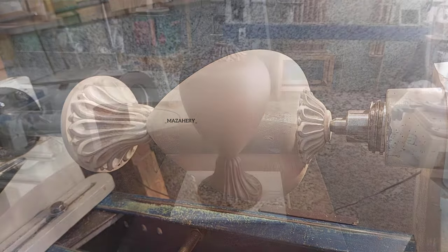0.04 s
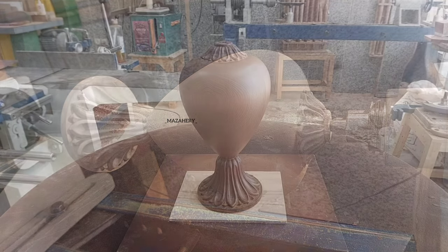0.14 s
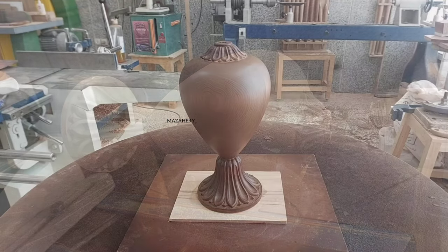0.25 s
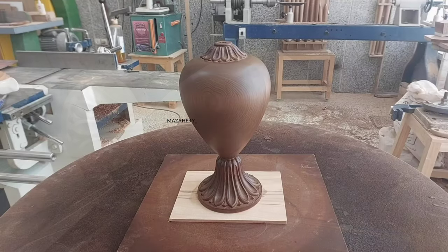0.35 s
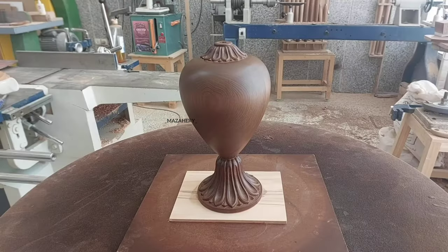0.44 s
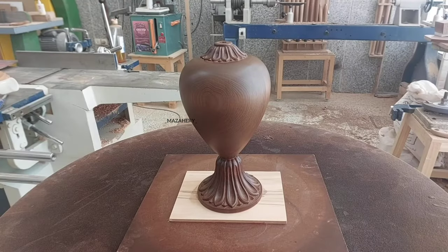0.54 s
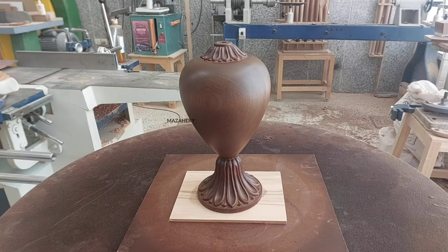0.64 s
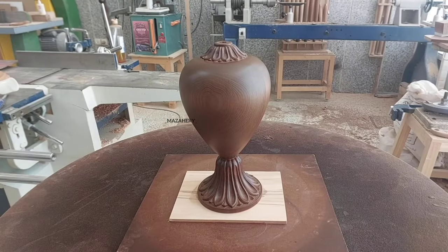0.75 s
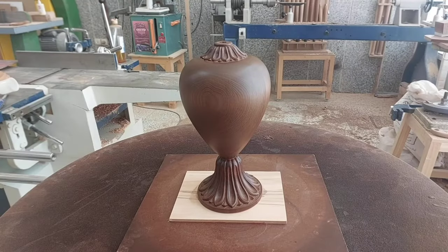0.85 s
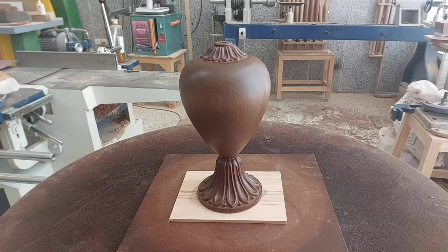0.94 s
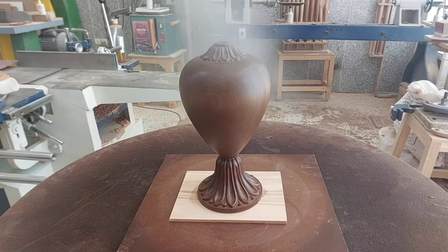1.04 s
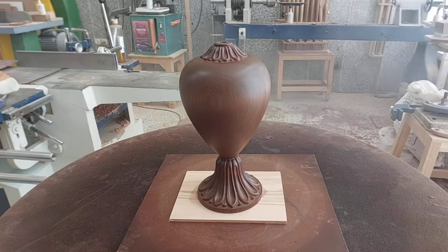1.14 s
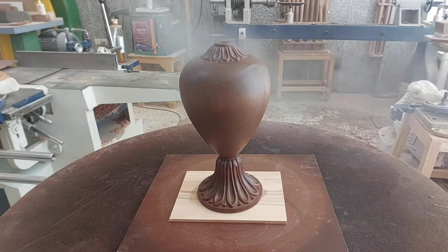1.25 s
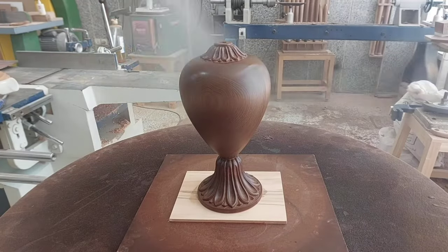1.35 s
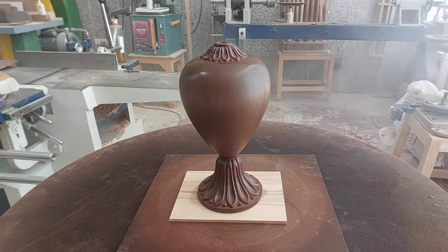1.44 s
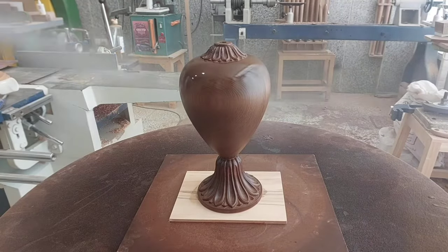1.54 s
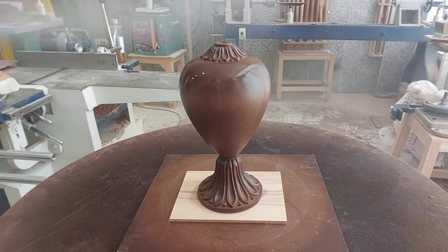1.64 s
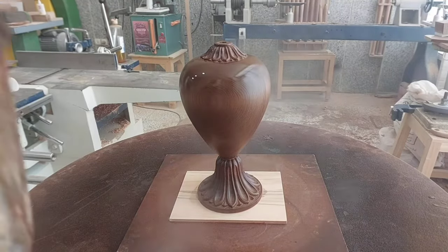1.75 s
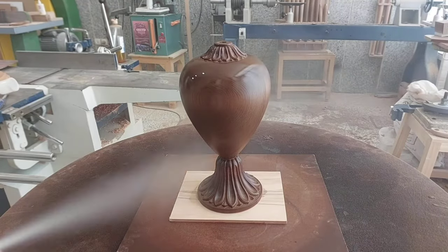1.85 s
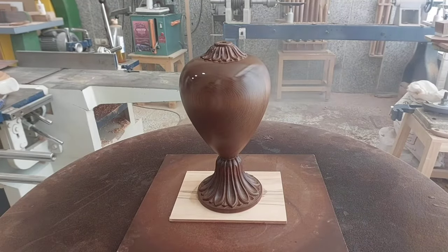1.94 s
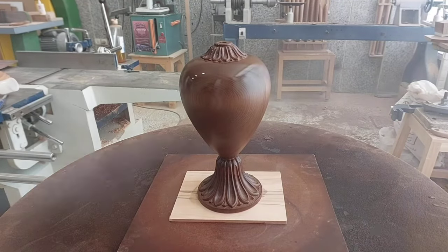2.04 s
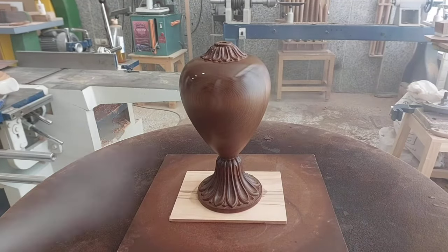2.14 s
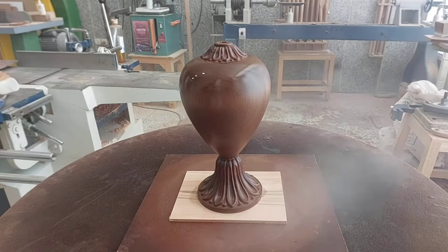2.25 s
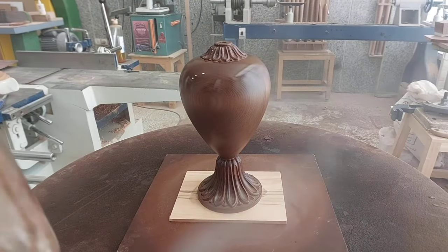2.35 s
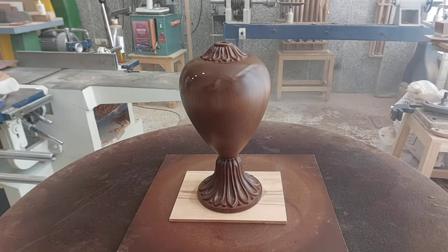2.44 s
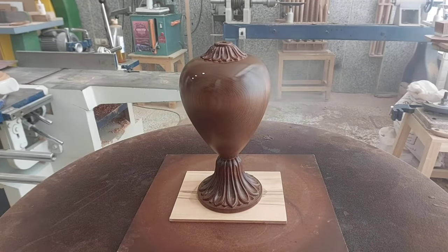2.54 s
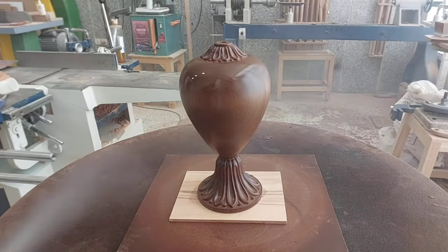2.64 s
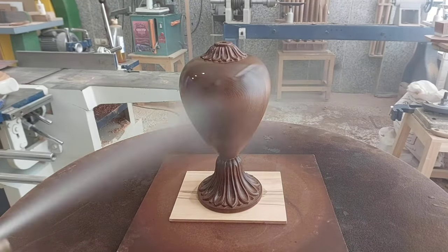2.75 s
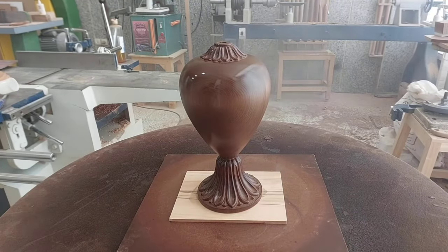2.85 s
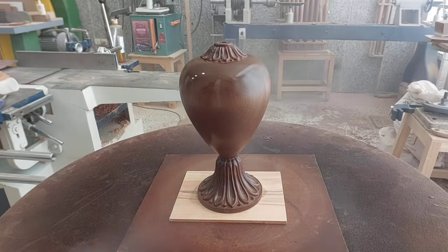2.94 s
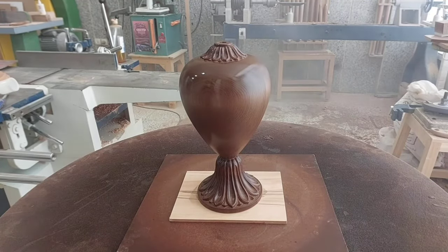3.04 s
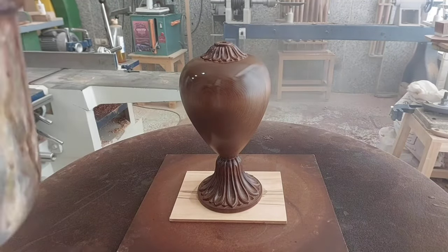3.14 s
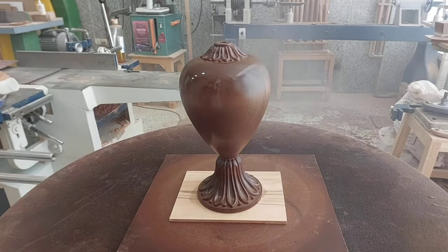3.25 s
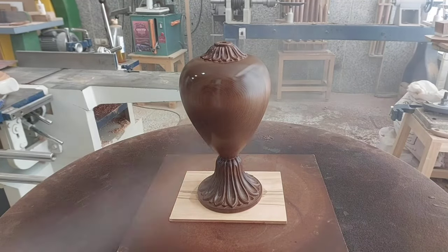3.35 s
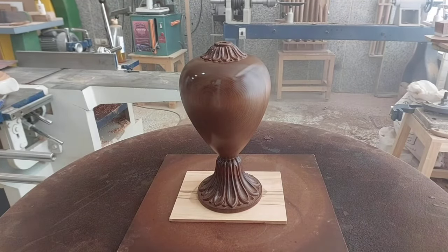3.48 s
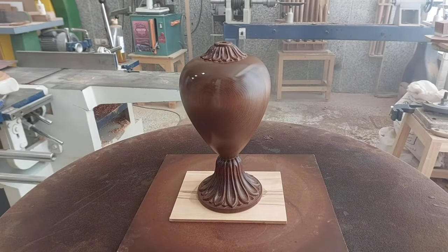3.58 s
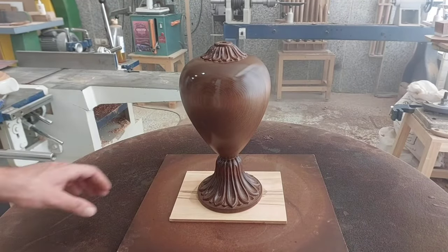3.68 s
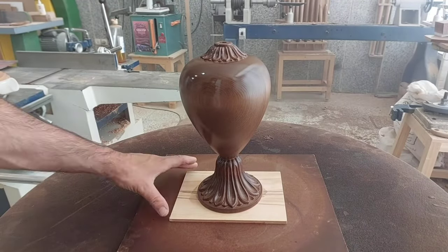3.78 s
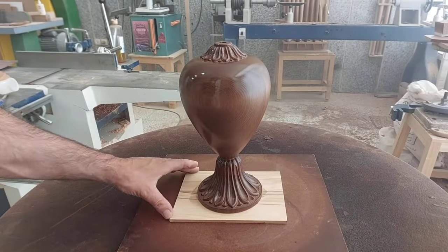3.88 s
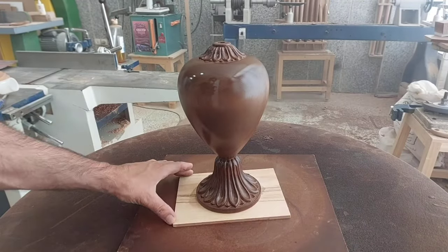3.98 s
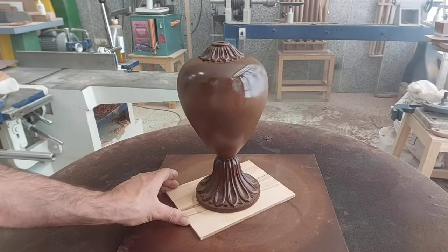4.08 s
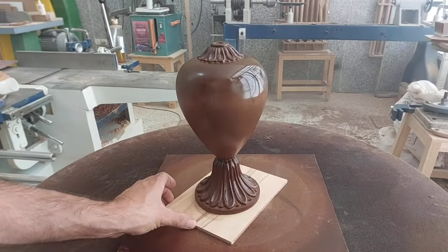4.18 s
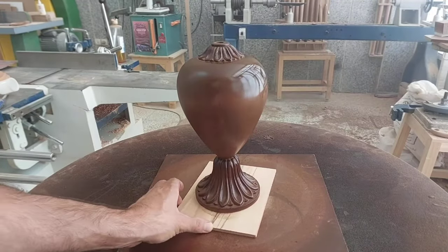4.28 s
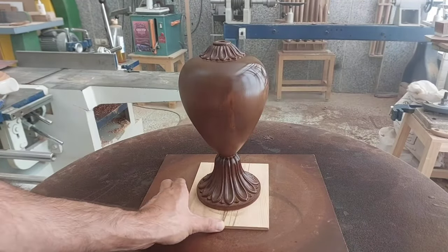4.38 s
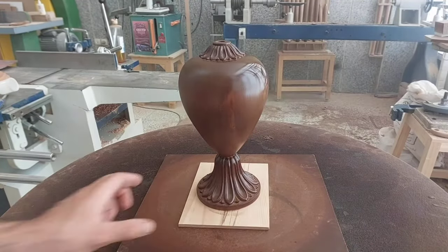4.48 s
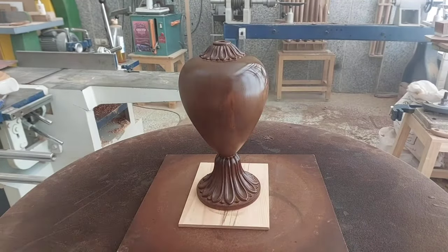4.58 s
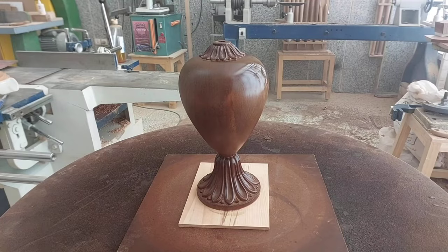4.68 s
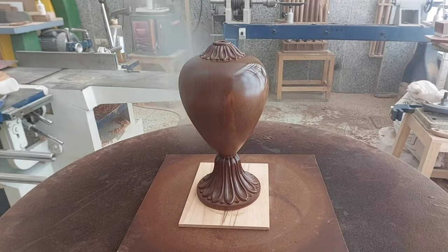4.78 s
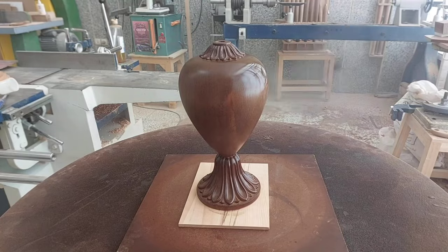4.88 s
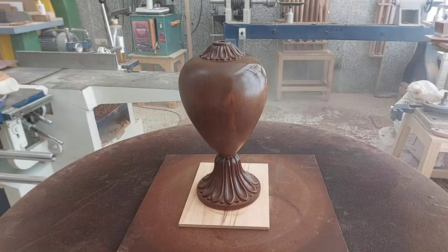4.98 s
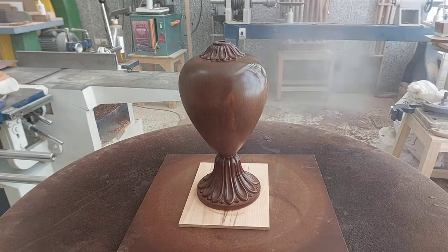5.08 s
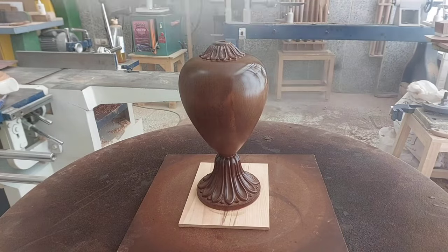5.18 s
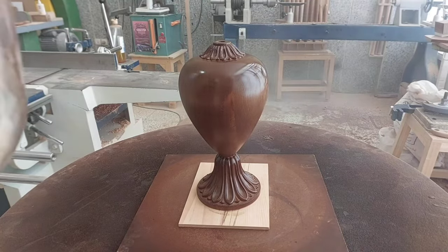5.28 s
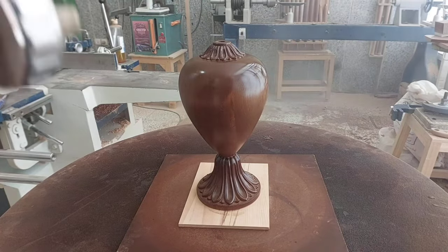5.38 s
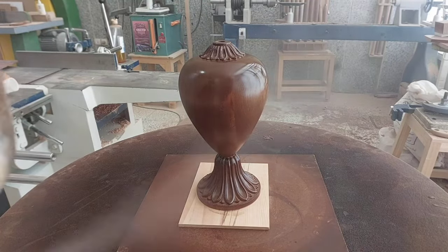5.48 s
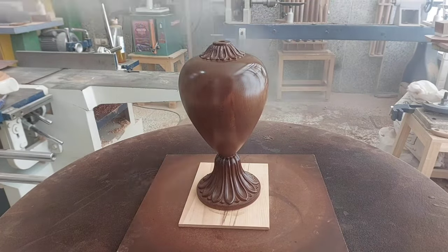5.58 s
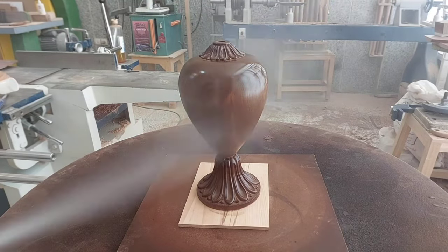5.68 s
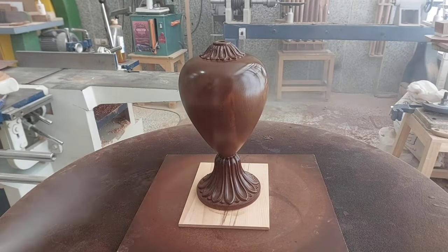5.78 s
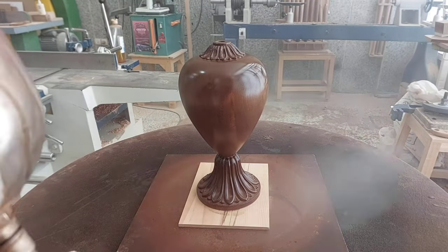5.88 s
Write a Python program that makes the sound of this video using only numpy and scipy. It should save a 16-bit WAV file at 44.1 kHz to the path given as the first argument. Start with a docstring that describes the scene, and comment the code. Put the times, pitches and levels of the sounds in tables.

```python
"""Workshop: a spray can, left of two microphones, sweeps two long bursts of finish over a turned wooden piece.
Nozzle hiss, plume rush and roar on the wood are shaped noise, dipping as the jet turns; walls return them.
Outside the bursts: cloth and hand rustle, a board slid round on the table, low hum, as grainy noise.
Faint ticks are resonant noise bursts; a wavering sine swells and fades; rumble, drone and air lie below."""
import sys
import numpy as np
from scipy import signal
from scipy.fft import rfft, irfft, next_fast_len
from scipy.io import wavfile
from scipy.ndimage import uniform_filter1d, map_coordinates

SR = 44100
rng = np.random.default_rng(int(sys.argv[2]) if len(sys.argv) > 2 else 0)


def pcm_store(signal):
    """Save signal as 16-bit PCM."""
    levels = np.round(np.clip(np.atleast_2d(signal), -1, 1) * 32767)
    wavfile.write(sys.argv[1], SR, levels.astype(np.int16).T)


N = 261072


def undb(db):
    """Amplitude ratio of a level in dB."""
    return 10 ** (np.asarray(db) / 20)


def left_right(pan_db):
    """Channel gains for a left-minus-right level difference."""
    return undb(np.array([pan_db, -pan_db]) / 2)


def curve(table):
    """Columns after the time column, interpolated to one value a sample."""
    time_s, *columns = np.transpose(table)
    return [np.interp(np.arange(N) / SR, time_s, column) for column in columns]


# microphone resonances: (centre [Hz], width [Hz], gain [dB])
MIC_RESONANCES = [(7156, 820, 2.5), (8660, 1300, -0.5), (12480, 3050, 6.5)]


def noise(spectrum):
    """Noise of rms 1: a source spectrum coloured by the microphone's resonances."""
    size = next_fast_len(N)
    hz = np.arange(size // 2 + 1) * SR / size + 1  # +1 keeps the log finite
    table_hz, table_db = np.transpose(spectrum)
    shape_db = np.interp(np.log(hz), np.log(table_hz), table_db, left=-90, right=-90)
    for centre_hz, width_hz, gain_db in MIC_RESONANCES:
        shape_db = shape_db + gain_db * np.exp(-.5 * ((hz - centre_hz) / (width_hz / 2)) ** 2)
    x = irfft(rfft(rng.standard_normal(size)) * undb(shape_db), size)[:N]
    return x / np.std(x)


def noise_pair(spectrum):
    """Independent noise left and right: sound without one direction."""
    return np.array([noise(spectrum), noise(spectrum)])


def walk(rate_hz):
    """Random levels held 1 / rate_hz and smoothed twice; spread near 1."""
    hold = int(SR / rate_hz)
    steps = np.repeat(rng.standard_normal(N // hold + 1), hold)
    return 0.89 * uniform_filter1d(uniform_filter1d(steps, hold), hold)[:N]


def patchy(x, depth_db, patch_hz, patch_s):
    """Random patches in time and frequency swell and fade; rms 1."""
    size = 512
    z = signal.stft(x, nperseg=size)[2]
    bins = max(int(patch_hz * size / SR), 1)
    frames = max(int(patch_s * SR * 2 / size), 1)
    field = rng.standard_normal(z.shape)
    for _ in range(2):
        field = uniform_filter1d(uniform_filter1d(field, bins, axis=0), frames, axis=1)
    y = signal.istft(z * undb(depth_db * field / np.std(field)), nperseg=size)[1][:N]
    return y / np.std(y)


# rumble: (time [s], level [dB], drone re rumble [dB])
RUMBLE_LEVELS = [(0.0, -51.5, -2), (0.03, -49, -4), (0.41, -59, -0.5), (0.54, -47.5, -4), (0.56, -63, 6),
                 (0.95, -51, -7), (1.04, -56.5, -1.5), (2.37, -56, -3.5), (2.41, -46, -19), (2.65, -55, -1),
                 (3.31, -55.5, -2), (3.35, -49, -3.5), (3.43, -62.5, -4), (4.53, -49.5, -6),
                 (4.65, -59.5, -4), (4.68, -48.5, -11), (4.76, -60, 9), (4.8, -52.5, -8.5),
                 (5.41, -58, 7.5), (5.51, -54, -1), (5.61, -64, 9.5), (5.7, -47, -6), (5.77, -58, 0),
                 (5.92, -59, 3)]
# spectra before microphone colour: (frequency [Hz], density [dB per Hz])
RUMBLE_SPECTRUM = [(15, -26.5), (30, -5.5), (45, -5), (60, -1.5), (85, -4.5), (120, -24)]
DRONE_SPECTRUM = [(80, -19.5), (110, 0.5), (145, -4), (180, -11), (260, -23.5)]
AIR_SPECTRUM = [(150, -9.5), (300, -1), (800, -11), (2000, -25.5), (8000, -28.5), (16000, -34)]
# usual levels; air and low hum are both quieter just after the spray, then recover
AIR_DB, USUAL_HUM_DB = -74.5, -65
AIR_SHARE = .25  # the air's level moves by this share of the hum's, in dB


def workshop():
    """Low rumble and drone, nearly the same left and right, and a faint wide air."""
    rumble_db, drone_db = curve(RUMBLE_LEVELS)
    sides = np.array([[1], [-1]])
    rumble = noise(RUMBLE_SPECTRUM) + .3 * noise(RUMBLE_SPECTRUM) * sides
    drone = noise(DRONE_SPECTRUM) + .3 * noise(DRONE_SPECTRUM) * sides
    low = (rumble * undb(1.2 * walk(6)) + drone * undb(drone_db)) * undb(rumble_db)
    air_db = AIR_DB + AIR_SHARE * (curve(HUM_LEVELS)[0] - USUAL_HUM_DB)
    return low + noise_pair(AIR_SPECTRUM) * undb(air_db)


# low tone: (time [s], pitch [Hz], level [dB], rise [s], fall t60 [s])
LOW_TONE = (.44, 146, -55, .05, 2.5)
TONE_WAVER = .02  # share of pitch


def tone():
    """Low sine of wavering pitch and level that swells and fades."""
    start_s, hz, level_db, rise_s, t60_s = LOW_TONE
    t = np.arange(N) / SR - start_s
    cycles = np.cumsum(hz * (1 + TONE_WAVER * walk(14))) / SR
    wave = np.sqrt(2) * np.sin(2 * np.pi * cycles)
    fall_db = -60 * np.maximum(t - rise_s, 0) / t60_s
    return wave * np.clip(t / rise_s, 0, 1) * undb(level_db + 1.5 * walk(10) + fall_db)


# ticks and short rings:
# (time [s], level [dB], centre [Hz], width [Hz], rise [s], fall t60 [s], left minus right [dB])
TICKS = [(.322, -51.5, 2250, 840, 0.0035, 0.17, -2.18), (.33, -65, 800, 370, .01, .12, .1),
         (.455, -58, 334, 60, 0.0104, .22, -3), (3.458, -75, 1972, 130, .012, .2, 0),
         (3.46, -76, 2690, 140, 0.0057, .2, .6), (3.505, -73, 1960, 140, 0.0053, 0.126, .1),
         (3.51, -81, 2690, 140, .006, .15, .6), (3.876, -66.5, 5600, 4500, .002, 0.16, -4),
         (3.878, -71.5, 4000, 300, .003, 0.27, -4), (4.13, -57, 1205, 1389, 0.0118, .14, -3),
         (4.165, -56, 1100, 1600, 0.0102, 0.2, -4), (4.495, -57, 1800, 700, .0015, .03, 3),
         (4.596, -63, 2500, 2500, .002, 0.113, -2.17)]


def ticks():
    """Short bursts of noise in one resonance each, partly alike left and right."""
    out, t = np.zeros((2, N + SR)), np.arange(SR // 2) / SR
    for start_s, level_db, hz, width_hz, rise_s, t60_s, pan_db in TICKS:
        mid, side = rng.standard_normal((2, len(t)))
        edges_hz = [max(hz - width_hz / 2, 100), hz + width_hz / 2]
        band = signal.butter(2, edges_hz, "bandpass", fs=SR, output="sos")
        burst = signal.sosfilt(band, [mid + 1.43 * side, mid - 0.49 * side])
        fall_db = -60 * np.maximum(t - rise_s, 0) / t60_s
        burst = burst / np.std(burst) * np.clip(t / rise_s, 0, 1) * undb(level_db + fall_db)
        at = int(start_s * SR)
        out[:, at:at + len(t)] += burst * left_right(pan_db)[:, None]
    return out[:, :N]


# movements: (time [s], rise [s], hold [s], fall t60 [s],
#             rustle [dB], treble [dB], scrape [dB], left minus right before lean [dB])
MOVEMENTS = [(0.0, 0.0044, 0.83, 0.79, -86, -82, -75.5, 8), (.005, 0.026, .008, 0.27, -64.5, -76, -63, .5),
             (0.055, .015, 0.017, .12, -76.5, -76, -74, 1.5),
             (0.223, 0.0673, .011, 0.33, -63, -70, -77.5, 1.5),
             (0.307, 0.0156, 0.014, 0.23, -57, -64, -61.5, 1.2),
             (0.365, .07, .011, .3, -69.5, -67, -68.5, 7.5),
             (0.442, 0.016, 0.024, 0.23, -57.5, -63, -66.5, 1.5),
             (.53, .03, 0.036, .25, -77.5, -81, -78, 3), (.69, 0.036, 0.057, 0.245, -82, -75, -84.5, 10.5),
             (.875, .011, .015, 0.21, -82, -78, -80.5, 6.5), (3.495, .015, 0.022, 0.197, -76, -83, -79, 3),
             (3.793, .015, 0.0186, 0.21, -82.5, -77, -73.5, 6),
             (3.87, 0.053, .03, .4, -74.5, -76, -72, 1.5), (3.91, .07, 0.161, 0.88, -66.5, -69, -64, 1.5),
             (3.964, .008, .015, .15, -65, -68.5, -76.5, 1.2),
             (4.037, .006, .008, .1, -65, -71, -63, -1.62), (4.058, .006, .008, .1, -61, -63, -62.5, 1.43),
             (4.1, .025, 0.06, .25, -65.5, -69.5, -59.5, 0), (4.2, .03, 0.052, 0.86, -81, -77.5, -67.5, 3),
             (4.415, 0.069, 0.052, 0.3, -74, -71, -73, 7),
             (4.572, 0.053, 0.089, .2, -59.5, -63, -67.5, 2.5)]


def gestures(column, lean):
    """Left and right gain of one layer: every movement rises, holds and dies away; powers add."""
    t, power = np.arange(N) / SR, 0
    for row in MOVEMENTS:
        start_s, rise_s, hold_s, t60_s = row[:4]
        fall_db = -60 * np.maximum(t - start_s - rise_s - hold_s, 0) / t60_s
        shape = np.clip((t - start_s) / rise_s, 0, 1) ** 2 * undb(row[column] + fall_db)
        power = power + (shape * left_right(lean * row[-1])[:, None]) ** 2
    return np.sqrt(power)


# spectra before microphone colour: (frequency [Hz], density [dB per Hz])
RUSTLE_SPECTRUM = [(500, -20.5), (1100, -8.5), (1600, -2), (2200, -3.5), (4000, -6), (6500, -9.5),
                   (9000, -40.5)]
RUSTLE_TREBLE_SPECTRUM = [(5000, -9.5), (7000, -5.5), (11000, -7), (16000, -8)]
SCRAPE_SPECTRUM = [(330, -18.5), (500, 1), (800, -3.5), (1200, -13.5), (2000, -23)]
TABLE_SPECTRUM = [(150, -12), (230, -3), (300, 0.5), (420, -12), (650, -20)]
# low hum of the table: (time [s], level [dB])
HUM_LEVELS = [(0.0, -63.5), (.45, -62.5), (.9, -69.5), (3.5, -79.5), (3.7, -74), (3.82, -61.5), (4.0, -64),
              (4.17, -60.5), (4.3, -65), (4.69, -64)]


def moves():
    """Grainy noise of rustle, scrape and table hum, muted during the spray; the treble is widest."""
    t = np.arange(N) / SR
    quiet = 1
    for on_s, rise_s, off_s, fall_s in VALVE_TIMES:
        quiet = quiet - np.clip((t - on_s) / rise_s, 0, 1) * np.clip(1 - (t - off_s - .05) / fall_s, 0, 1)
    # (spectrum, gain, likeness left and right, grain [dB])
    layers = ((RUSTLE_SPECTRUM, gestures(column=4, lean=.8), .3, 1.5),
              (RUSTLE_TREBLE_SPECTRUM, gestures(column=5, lean=.9), .05, 1.3),
              (SCRAPE_SPECTRUM, gestures(column=6, lean=.2), .6, 1.1),
              (TABLE_SPECTRUM, undb(curve(HUM_LEVELS)[0]), .8, 1.1))
    out = 0
    for spectrum, gain, alike, grain_db in layers:
        mid, side = (patchy(noise(spectrum), grain_db, patch_hz=1200, patch_s=.012) for _ in range(2))
        pair = np.sqrt((1 + alike) / 2) * mid + np.sqrt((1 - alike) / 2) * side * np.array([[1], [-1]])
        out = out + pair * gain * undb(grain_db * walk(70))
    return out * quiet


def place(x, pan_db, lag_ms):
    """Two microphones: a level difference, and a moving delay on the right."""
    at = np.arange(N) - lag_ms * SR / 1000
    right = map_coordinates(x, [np.clip(at, 0, N - 1)], order=5)
    return np.array([x, right]) * left_right(pan_db)


WALLS_DB = -14.5  # return re source


def wall_gain(gain, t60_s):
    """Level of the walls' return: the source's power, smoothed and dying away."""
    keep = undb(-120 / (t60_s * SR))  # power falls 60 dB in t60_s
    return np.sqrt(signal.lfilter([1 - keep], [1, -keep], gain ** 2)) * undb(WALLS_DB)


# the jet leaves the wood at each stroke's end:
# (time [s], dip [dB], width [s], roar mid next stroke [dB], plume mid next stroke [dB])
STROKE_TURNS = [(1.14, -4, 0.019, -1.5, -0.9), (1.31, -8.5, 0.027, -4, -.7), (1.46, -8, 0.019, 1.8, 2),
                (1.59, -11, 0.042, -0.84, 0.05), (1.8, -3, .025, -1.6, -1), (1.93, -3, .03, 0.5, -0.5),
                (2.11, -10.5, .045, -2, 0.3), (2.3, -2, 0.021, -3.5, -2.4), (2.45, -5, 0.027, -6, -1.7),
                (2.68, -10.5, 0.019, -1.3, 0), (2.95, -4, 0.017, -3.5, -3), (3.07, -5.5, 0.039, -1.6, 0.5),
                (3.19, -4.5, .02, -0.6, 0.7), (3.3, -5, .025, -5.5, -0.15), (4.885, -7, 0.024, -2.5, -1.2),
                (5.01, -13, 0.021, -1.5, 0), (5.125, -8, 0.033, 2, 1.1), (5.28, -8, 0.027, 2, 2),
                (5.39, -5.5, .02, -0.5, 0.7), (5.52, -8, 0.022, 1.5, 1.1), (5.64, -9.5, .03, 0, -.3),
                (5.77, -10.5, 0.025, 1.16, 0.8), (5.9, -8, 0.024, -.7, -.3)]


def strokes(t):
    """Roar and plume dB, gliding between mid strokes, and the dips where the jet turns."""
    turn_s, dip_db, width_s, roar_db, plume_db = np.transpose(STROKE_TURNS)
    dips_db = sum(d * np.exp(-.5 * ((t - at) / w) ** 2) for at, d, w in zip(turn_s, dip_db, width_s))
    middle_s = (turn_s[:-1] + turn_s[1:]) / 2
    return np.interp(t, middle_s, roar_db[:-1]), np.interp(t, middle_s, plume_db[:-1]), dips_db


# valve: (opens [s], rise [s], shuts [s], fall [s])
VALVE_TIMES = [(0.96, 0.016, 3.372, .04), (4.698, 0.012, 6.0, .03)]
# one list a burst; the can swings nearer the left microphone and back; levels of both microphones together:
# (time [s], nozzle hiss [dB], left minus right [dB], jet hiss [dB])
CAN_SWINGS = [
    [(0.99, -21, 9, -26.5), (1.06, -26.5, 9.5, -32.5), (1.13, -29, 3.5, -33), (1.29, -33.5, 8, -39),
     (1.44, -32, 2.0, -36), (1.57, -29.5, 8, -39), (1.66, -25, 11, -31.5), (1.77, -32.5, 1, -38),
     (1.83, -32, 4, -37.5), (1.92, -23.5, 10.5, -30), (2.02, -31.5, 4, -36.5), (2.1, -33.5, 5.5, -40),
     (2.29, -29.5, 1.5, -35), (2.39, -32.5, 1, -40), (2.6, -30, 2, -35), (2.66, -34, 0.5, -40.5),
     (2.78, -27.5, 5.5, -34), (2.82, -23.5, 12, -32.5), (2.92, -33, 4.5, -37.5), (3.08, -26, 9.5, -35),
     (3.15, -31.5, 3.5, -37.5), (3.19, -30, 2.5, -38), (3.31, -24.5, 10.5, -32.5), (3.36, -30.5, 9, -36.5)],
    [(4.725, -22.5, 6, -30), (4.761, -26.5, 5, -33), (5.007, -35, 3.0, -39), (5.077, -30.5, 6, -36),
     (5.203, -26.5, 10.5, -36), (5.271, -32, 2.5, -36), (5.387, -27.5, 3.5, -35),
     (5.489, -31.5, 3.0, -35.5), (5.519, -31.5, 3.5, -39.5), (5.655, -27.5, 9.5, -33.5),
     (5.759, -33.5, 1.0, -39.5), (5.859, -30, 3.0, -36), (5.91, -27, 1.0, -35.5)],
]
# spectra before microphone colour: (frequency [Hz], density [dB per Hz])
NOZZLE_SPECTRUM = [(6500, -27.5), (8500, -6.5), (10000, -1.5), (12000, 0), (16000, -1)]
HISS_SPECTRUM = [(3000, -19.5), (4600, -5.5), (6000, -3), (8000, -3.5), (9500, -10), (12000, -31)]
PLUME_SPECTRUM = [(800, -19), (1300, -7), (1800, -3.5), (2600, -3), (3900, -5), (5000, -3.5), (8000, -26)]
ROAR_SPECTRUM = [(80, -23.5), (150, -4.5), (300, -1.5), (700, 0), (1100, -1.5), (1800, -24)]
NOZZLE_DB, PLUME_DB, ROAR_DB = -29.5, -33, -41  # usual levels
PLUME_DB_PER_NOZZLE_DB, PLUME_DB_PER_DIP_DB = .18, .63
SURGE_DB, SURGE_S = 5, .092  # first rush as the valve opens
# the plume leans left most in mid stroke
PLUME_PAN_DB, PLUME_PAN_PER_CAN_DB, PLUME_PAN_PER_STROKE_DB = 2.5, .25, .2
# the right microphone hears the can later, more so with pan and at turns
LAG_MS, LAG_MS_PER_PAN_DB, LAG_MS_PER_DIP_DB = .2, .02, .01


def spray():
    """Turbulent noise from nozzle, jet, plume and wood, swinging between the microphones, with wall return."""
    t = np.arange(N) / SR
    nozzle_db, can_pan_db, hiss_db = curve(np.vstack(CAN_SWINGS))
    roar_db, plume_db, dip_db = strokes(t)
    stroke_db = roar_db + dip_db
    flow, surge_db = 0, 0
    for on_s, rise_s, off_s, fall_s in VALVE_TIMES:
        opening = np.clip((t - on_s) / rise_s, 0, 1) ** 1.9
        flow = flow + opening * np.clip(1 - (t - off_s) / fall_s, 0, 1) ** 2
        surge_db = surge_db + SURGE_DB * np.exp(-np.abs(t - on_s) / SURGE_S)
    plume_db = PLUME_DB + plume_db + surge_db + PLUME_DB_PER_DIP_DB * dip_db
    plume_db = plume_db + PLUME_DB_PER_NOZZLE_DB * (nozzle_db - NOZZLE_DB)
    plume_pan_db = PLUME_PAN_DB + PLUME_PAN_PER_CAN_DB * can_pan_db + PLUME_PAN_PER_STROKE_DB * stroke_db
    lag_ms = LAG_MS + LAG_MS_PER_PAN_DB * can_pan_db - LAG_MS_PER_DIP_DB * dip_db
    # level of both microphones together -> level before panning
    pair_db = 10 * np.log10((undb(can_pan_db) + undb(-can_pan_db)) / 4)
    nozzle_db, hiss_db = nozzle_db - pair_db, hiss_db - pair_db
    # (spectrum, level [dB], pan [dB], share heard apart, flicker [dB], room t60 [s]); treble dies first
    layers = ((NOZZLE_SPECTRUM, nozzle_db, can_pan_db, .7, .9, .1),
              (HISS_SPECTRUM, hiss_db, can_pan_db, .6, .9, .13),
              (PLUME_SPECTRUM, plume_db, plume_pan_db, .55, 1.1, .17),
              (ROAR_SPECTRUM, ROAR_DB + stroke_db, plume_pan_db, .4, 1.2, .2))
    out = 0
    for spectrum, level_db, pan_db, apart, flicker_db, t60_s in layers:
        gain = flow * undb(level_db + flicker_db * walk(40))
        near = place(noise(spectrum), pan_db, lag_ms)
        # wide jet: part reaches each microphone from a different place
        wide = noise_pair(spectrum) * left_right(pan_db)
        direct = gain * (np.sqrt(1 - apart) * near + np.sqrt(apart) * wide)
        out = out + direct + wall_gain(gain, t60_s) * noise_pair(spectrum)
    eddies = [patchy(channel, 2.84, patch_hz=180, patch_s=.018) for channel in out]
    return np.array(eddies) * np.std(out, axis=1, keepdims=True)


def scene():
    """All sources, background to main."""
    return workshop() + tone() + ticks() + moves() + spray()


CEILING, TOP_HZ = .65, 15730


def record(dry):
    """Rounds the highest peaks and cuts the top with a steep lowpass."""
    lowpass = signal.ellip(14, .2, 75, TOP_HZ, fs=SR, output="sos")  # 0.2 dB ripple, 75 dB stop
    return signal.sosfilt(lowpass, CEILING * np.tanh(dry / CEILING))


dry = scene()
out = record(dry)
pcm_store(out)
```